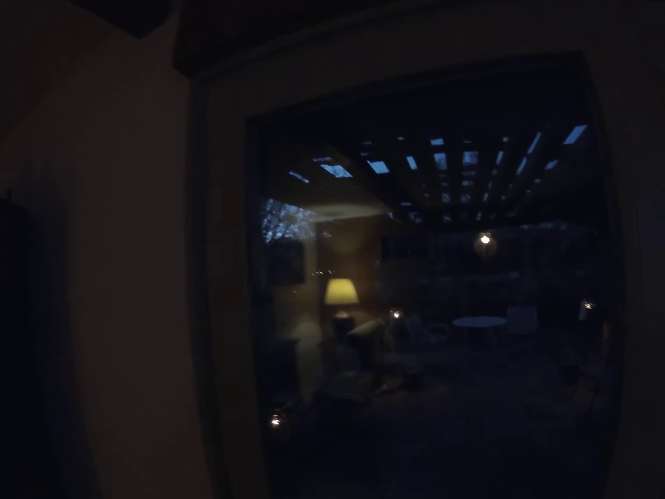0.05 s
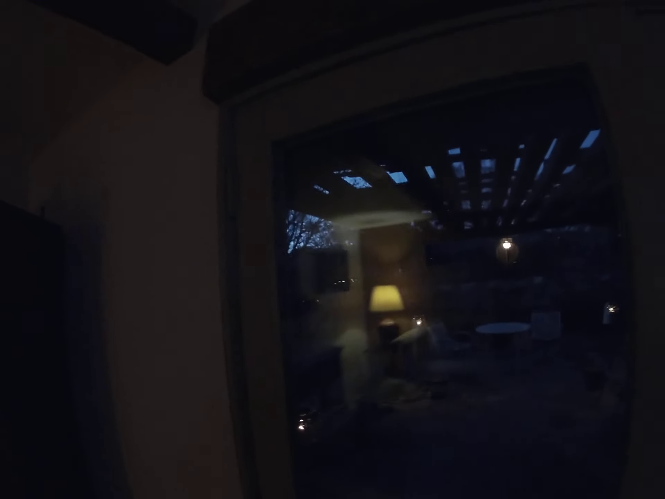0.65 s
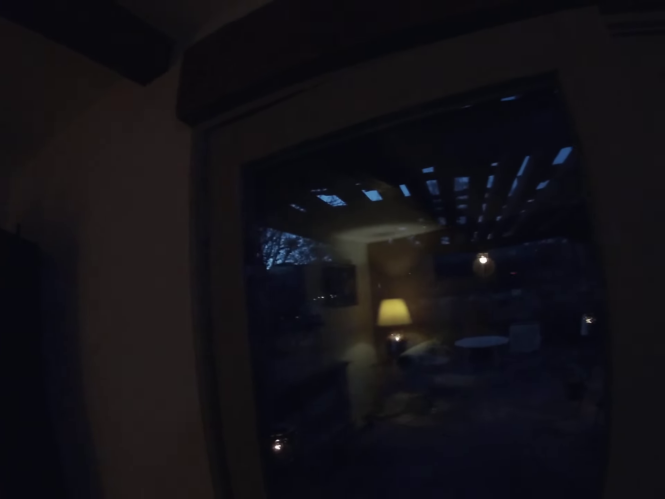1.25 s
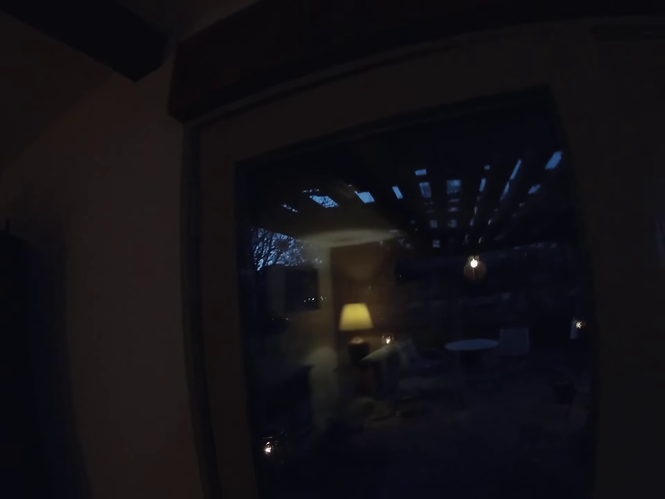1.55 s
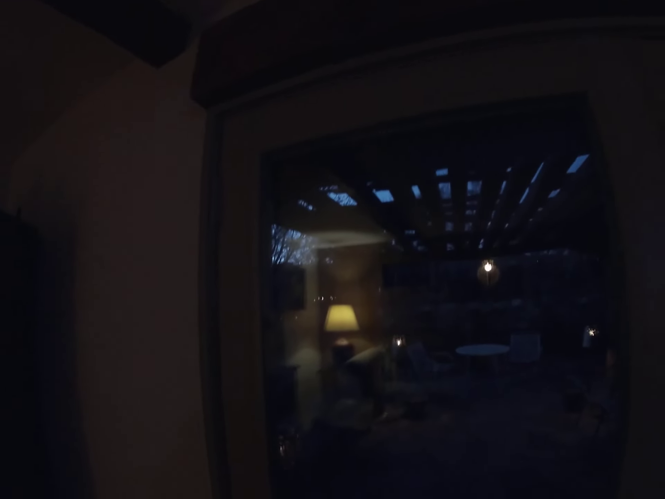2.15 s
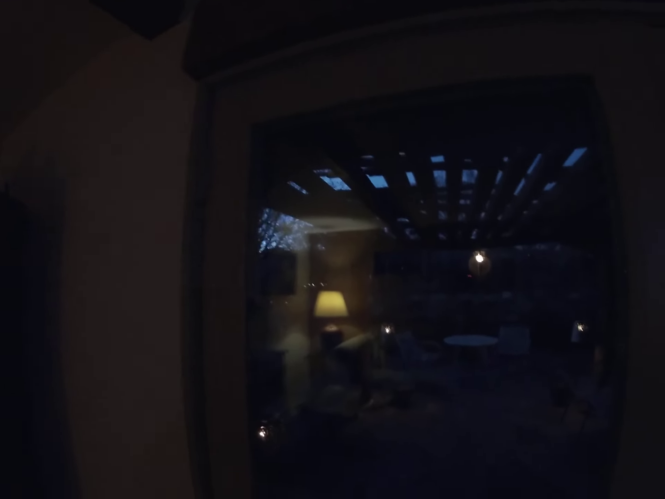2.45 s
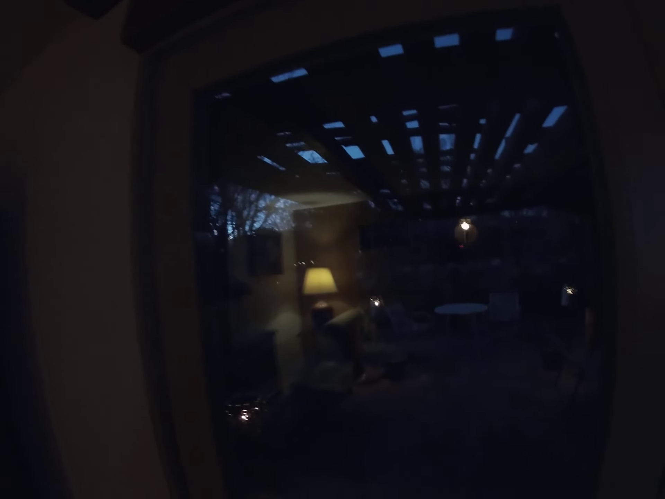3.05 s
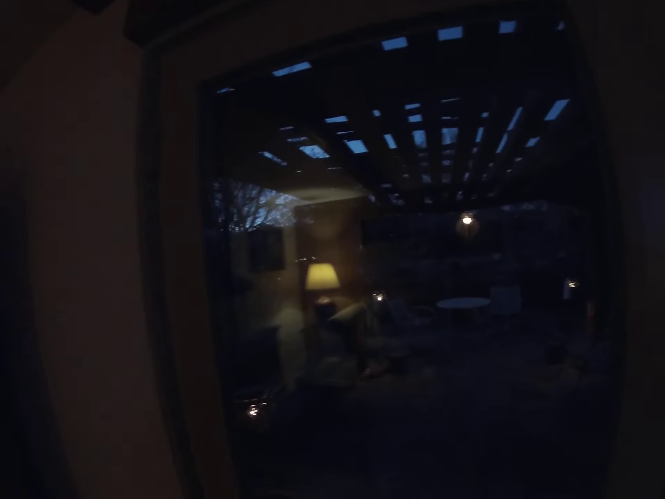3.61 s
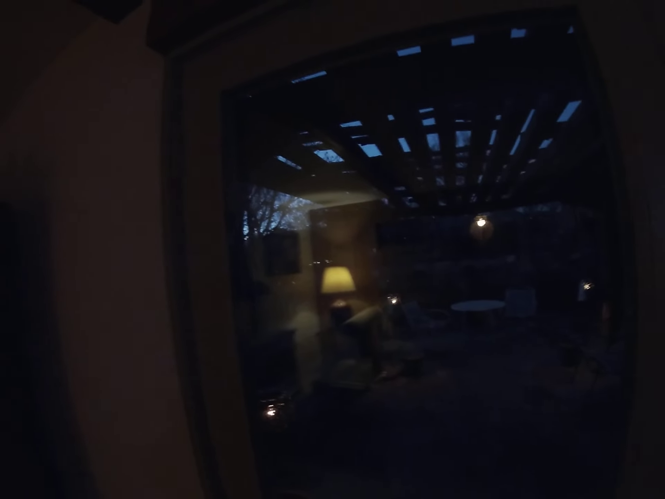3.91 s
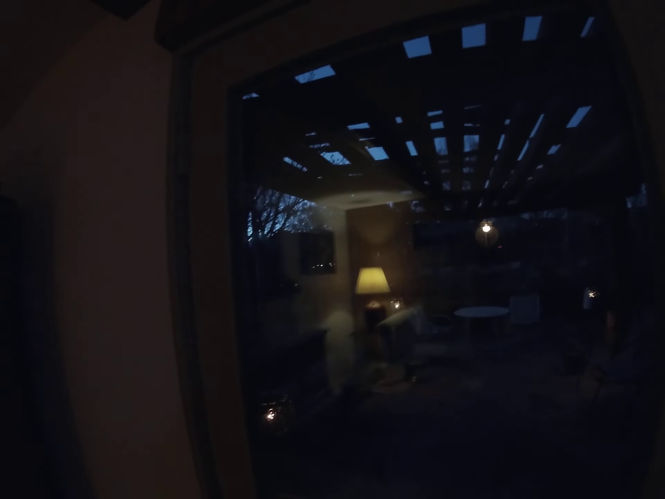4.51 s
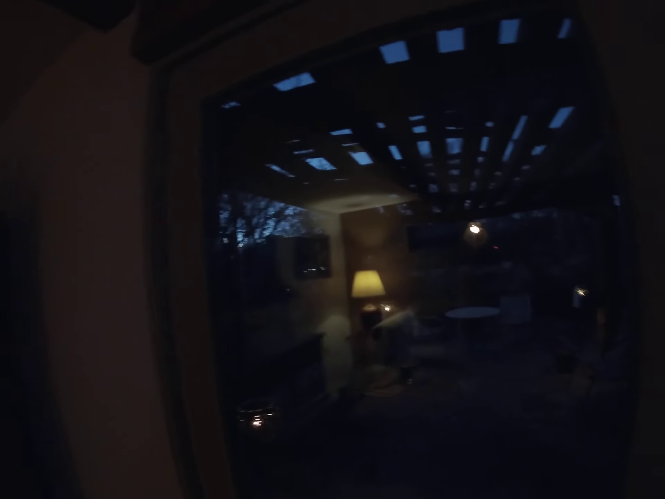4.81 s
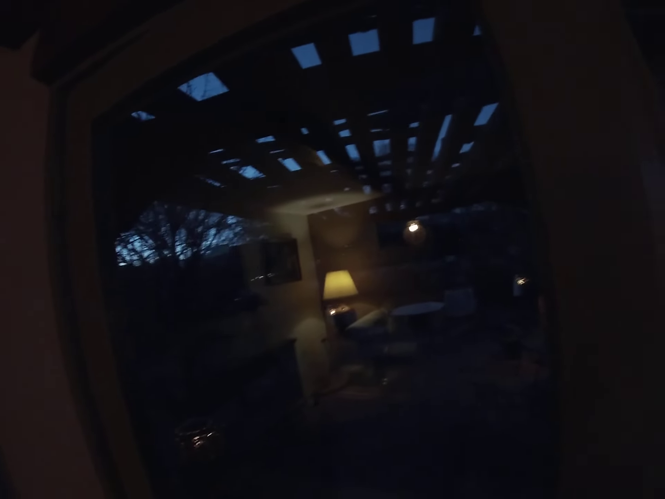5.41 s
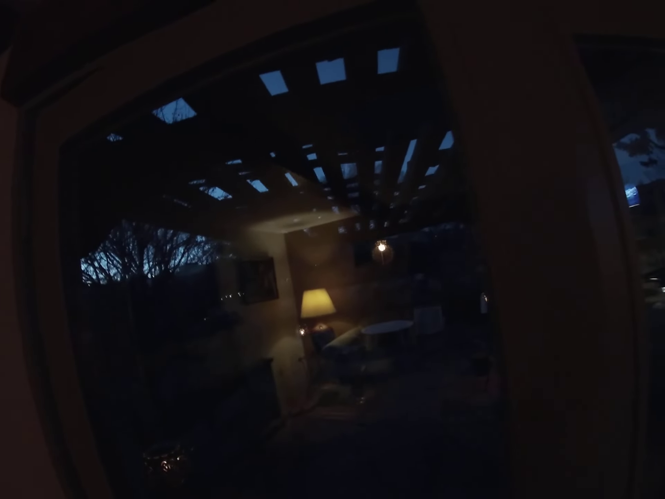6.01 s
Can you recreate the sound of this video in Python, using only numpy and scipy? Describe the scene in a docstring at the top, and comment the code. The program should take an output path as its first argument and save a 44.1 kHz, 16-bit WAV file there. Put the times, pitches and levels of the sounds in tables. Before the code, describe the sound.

Sharp clicks and rattles of a door's lock and handle, with a few heavier thunks as the glass-paned wooden door is shoved.

```python
"""A glass-paned wooden door worked by hand, close to a single microphone in a quiet living room.
Key, bolt and handle click and chatter in the lock; between the clicks metal scrapes and loose parts tick.
Each blow knocks the door in its frame and rings wood and glass. Two bouts of hard shoving, after a
gentler one, make the door boom and the air sway. The room answers the metal over a faint background."""
import sys
import numpy as np
from scipy import signal
from scipy.fft import rfft, irfft
from scipy.io import wavfile

SR = 44100
rng = np.random.default_rng(int(sys.argv[2]) if len(sys.argv) > 2 else 0)


def wav_record(signal):
    """Record a signal, one row per channel, as 16-bit PCM in the file named by sys.argv[1]."""
    frames = np.transpose(np.atleast_2d(signal))
    bounded = np.clip(frames, -1, 1)
    # unit amplitude maps onto the largest positive 16-bit level
    quanta = np.round(bounded * 32767).astype(np.int16)
    wavfile.write(sys.argv[1], SR, quanta)


N = 276066

# Blows of bolt and handle: start_s, level_db, weight_db, edge_db, pitch_hz, snap_share (0-1)
# Weight (into the wood) and edge (treble) are relative to the level; snap is the first impact's energy.
BLOWS = [(0.105, -61, -8, 2, 5300, .1), (0.1355, -30, -22, 2.5, 5950, 0.04),
         (0.144, -36.5, -35, 1, 2350, 0.92), (0.2208, -46, -10.5, -4, 2440, 0.67),
         (0.327, -51, -1.5, -4, 2740, 0.32), (0.34, -49, 1, -4, 2020, 0.25),
         (0.623, -47.5, -13.5, -4, 2050, 0.1), (0.97, -55, -9, -6, 1640, 0.1),
         (0.994, -41.5, -25, 0, 2300, 0.42), (1.1706, -36, -21, 2.5, 2450, 0.33),
         (1.304, -41.5, -14, -4, 1910, 0.18), (1.363, -45, 5.5, -7.5, 760, 0.27),
         (1.451, -48, 9, -21, 710, 0.19), (1.524, -47, 1.5, -5.5, 1800, 0.01),
         (1.5973, -50.5, 0.5, -6.5, 1755, 1), (1.766, -39.5, 2.5, -10.5, 1711, 0),
         (1.7943, -37, -5, 7.5, 2170, 0), (1.801, -30.5, -2.5, -7.5, 3290, 0.37),
         (1.884, -41, -5, -12, 3290, 0.97), (2.039, -29.5, -3, -2, 2056, 0.14),
         (2.067, -39, -9.5, 4.5, 4110, 0.62), (2.0896, -37, 7.5, -19, 1910, 1),
         (2.17, -41, 0.5, -7, 1950, 0.42), (2.402, -52.5, 16, -15.5, 710, 0),
         (2.543, -55.5, 11, -4.5, 975, 0.2), (2.699, -32.5, 3.5, -5.5, 1560, 0.07),
         (2.779, -48, -12, -4.5, 1470, 0.1), (2.964, -82, -8, 22, 5200, 0.18),
         (3.187, -51, -2, -12, 2130, 0), (3.267, -58.5, 2, -1, 2020, 0),
         (3.309, -53.5, 6.5, -12, 590, 0.25), (3.336, -50.5, -12, -6.5, 2040, 0.27),
         (3.368, -39, -10, -9, 2045, 0.4), (3.396, -44, -11, -1, 2470, 0.17),
         (3.46, -34.5, -21, -8, 1910, .4), (3.619, -65.5, -24, 2.5, 2240, 0.07),
         (3.68, -79.5, 26, -5, 590, .02), (3.919, -49, -3.5, -3, 5500, 0), (4.001, -52, 9.5, -5, 560, 0.37),
         (4.049, -48.5, 9, -10, 540, 0.34), (4.087, -45.5, -27, -13, 3300, 0.43),
         (4.3128, -38, -2.5, -4.5, 3260, 0.77), (4.391, -43, -18.5, -14, 3120, .95),
         (4.4148, -26.5, -14.5, -9.5, 2145, 0.42), (4.4414, -30.5, -23, -2.5, 1332, 0.7),
         (5.141, -54, 7.5, -10, 930, 0.21), (5.24, -49, -6.5, -2, 1720, 0.08),
         (5.358, -54, -15, 8, 5500, .3), (5.406, -52.5, -21, 7, 1970, 0),
         (5.438, -42.5, -5, -4.5, 1980, 0.02), (5.9, -47, -4.5, -5.5, 1640, 0.08),
         (5.953, -43.5, -2.5, -3.5, 1090, 0), (6.029, -55, 1, 1.5, 1516, .3),
         (6.07, -40.5, -12, -2.5, 2000, 0.13), (6.077, -40, -13.5, -3.5, 1860, 0.3),
         (6.119, -50.5, 6, 7, 3240, 0.1), (6.157, -36, -15, -1, 1720, 0.1)]
# Pushes on the whole door: start_s, level_db
PUSHES = [(.55, -49.5), (0.634, -44), (0.857, -50), (1.805, -27.5), (1.9, -21), (2.034, -13.5),
          (2.111, -18.5), (2.173, -27), (4.278, -39.5), (4.31, -30), (4.368, -24)]
# Strokes of metal on metal: start_s, end_s, level_db, squeak_hz, squeak_height_db
STROKES = [(0.347, .38, -57.5, 3500, 4), (0.5, 0.61, -63.5, 2100, 14), (.615, 0.733, -53, 2210, 15.5),
           (1.368, 1.58, -67.5, 1390, 6.5), (1.588, 1.661, -61, 1800, 16), (1.744, 1.841, -48, 1545, 7.5),
           (1.839, 2.08, -59, 1993, 7), (2.041, 2.115, -42.5, 1230, 8), (2.5, 2.66, -69, 975, -2.5),
           (3.366, 3.44, -54.5, 1900, 5), (3.441, 3.514, -52.5, 1620, 21), (3.951, 4.07, -59.5, 1212, 6),
           (4.256, 4.404, -53, 2050, 9.5), (4.43, 4.457, -32.5, 3700, 7), (5.186, 5.26, -64.5, 2430, 2.5),
           (5.384, 5.44, -54, 5400, 9.5), (5.92, 5.958, -54, 2400, 5), (6.054, 6.114, -49, 1670, 4),
           (6.092, 6.148, -51, 4460, 5)]
# Response of the lock and its plate: frequency_hz, gain_db
LOCK_BODY = [(60, 15.5), (250, 32), (500, 38), (900, 36.5), (1300, 36), (1650, 38.5), (2100, 35.5),
             (2700, 34), (3400, 34), (4700, 32.5), (6200, 31.5), (7300, 23), (9300, 7), (14000, -20)]
# Modes of a struck pin or spring: pitch_ratio, level_db, t60_s
PIN_MODES = [(1, 2.5, 0.014), (1.089, -6.5, .016), (1.65, -4, .015), (3.5, -5, 0.025)]
# Modes of the door frame: pitch_hz, level_db, t60_s
FRAME_MODES = [(191.3, -3, 0.21), (292, -6.5, 0.031), (578.5, -14, 0.014)]
# Modes of the wooden panel: pitch_hz, level_db, t60_s
PANEL_MODES = [(162.8, -5, 0.51), (214.67, 0.5, 0.58), (352, -13, 0.45), (452.5, -15.5, 0.28)]
# Modes of the glass: pitch_hz, level_db, t60_s
PANE_MODES = [(81.5, -3.5, .4), (108.7, 1.5, 0.33), (122.9, -1, 0.34), (253.5, -7, 0.32),
              (287.4, -8.5, 0.5)]
# Modes of the whole door leaf: pitch_hz, level_db, t60_s
LEAF_MODES = [(26, -4, 0.16), (41.48, 0, 0.72), (54.4, -12, 0.18)]
# Spectrum of the wood's many close modes: frequency_hz, level_db
THUD_SPECTRUM = [(40, -4.5), (90, -6.5), (150, 3.5), (210, 4), (320, -6.5), (500, -14.5), (900, -19.5),
                 (2000, -49), (5000, -98.5)]
# Reverberation of the living room: frequency_hz, t60_s
ROOM_DECAY = [(100, 0.5), (260, 0.41), (700, 0.42), (1840, 0.33), (4850, 0.34), (8000, 0.23), (13000, 0.37)]
# Spectrum of the room's background: frequency_hz, level_db
ROOM_TONE = [(25, 6), (100, -5.5), (190, 3), (300, -11), (450, -16), (650, -11.5), (850, -4), (1100, -17),
             (2000, -17), (3300, -21.5), (5500, -17.5), (8000, -29.5), (10500, -33.5), (14000, -58)]
# Spectrum of the shoved door's rumble: frequency_hz, level_db
RUMBLE_SPECTRUM = [(10, -7.5), (25, -11), (58, -3), (90, -5.5), (160, -20), (500, -89.5)]
# Colour of sliding metal: frequency_hz, gain_db
SCRAPE_COLOUR = [(500, -1.5), (2000, 1.5), (6000, -5)]


def amp(db):
    """Decibels to gain."""
    return 10 ** (np.asarray(db) / 20)


def unit(x):
    """Scale to rms 1."""
    return x / np.sqrt(np.mean(x ** 2) + 1e-20)


def along(points, hz):
    """(Hz, value) points read on a log axis."""
    frequencies, values = np.transpose(points)
    return np.interp(np.log(hz + 1), np.log(frequencies + 1), values)


def add(track, start_s, sound):
    """Mix a sound into the track."""
    part = track[max(round(start_s * SR), 0):][:len(sound)]
    part += sound[:len(part)]


def noise(spectrum, size):
    """Coloured noise of rms 1."""
    hz = np.fft.rfftfreq(size, 1 / SR)
    return unit(irfft(rfft(rng.standard_normal(size)) * amp(along(spectrum, hz)), size))


def ring(modes, t, scatter_db=1.5, detune=0.011):
    """Damped modes, at new strengths and slightly new pitches for every blow."""
    sound = np.zeros(len(t))
    for hz, db, t60 in modes:
        loud, sharp = rng.standard_normal(2)
        envelope = amp(db + scatter_db * loud - 60 * t / t60)
        sound += envelope * np.sin(2 * np.pi * hz * (1 + detune * sharp) * t)
    return sound


def blow_colour(db, weight_db, edge_db):
    """Spectrum of one blow as (Hz, dB): weight fills the low end, a bare edge the top."""
    return [(700, db + weight_db / 2 + 2), (1600, db), (2500, db), (4500, db + edge_db)]


def lock_response(colour, peak_hz, peak_db, width, size=1024):
    """Minimum-phase impulse response of the lock, coloured by the contact, with one added resonance."""
    hz = np.fft.rfftfreq(size, 1 / SR)
    peak = np.exp(-(np.log((hz + 1) / peak_hz) / width) ** 2)
    gain = amp(along(LOCK_BODY, hz) + along(colour, hz) + peak_db * peak)
    cepstrum = irfft(np.log(gain))
    cepstrum[1:size // 2] *= 2
    cepstrum[size // 2 + 1:] = 0
    return irfft(np.exp(rfft(cepstrum)))


def room_tail(wet_db, build_s=0.0052):
    """What the walls send back to the microphone: echoes build up, and the bass lingers longest."""
    hz, t, spectra = signal.stft(rng.standard_normal(SR * 2 // 3), SR, nperseg=256)
    decay = amp(-60 * t / along(ROOM_DECAY, hz)[:, None])
    echo = signal.istft(spectra * decay, SR, nperseg=256)[1]
    echo *= 1 - np.exp(-(np.arange(len(echo)) / SR / build_s) ** 2)
    return amp(wet_db) * echo / np.linalg.norm(echo)


def room_tone(level_db=-69):
    """The faint, steady background of the living room."""
    return amp(level_db) * noise(ROOM_TONE, N)


def lock_clicks(contacts, chatter_t60=0.024, rebound_s=0.0077, rebound_db=-12.5, lead_in_s=0.0052):
    """Each contact snaps and dies in a chatter of tiny rebounds that ring the struck part."""
    track, t = np.zeros(N), np.arange(SR // 20) / SR
    for start_s, db, weight_db, edge_db, pitch_hz, snap in contacts:
        chatter = rng.standard_normal(len(t))
        chatter *= amp(0.5 * rng.standard_normal(len(t)) - 60 * t / chatter_t60)
        chatter *= 1 - np.exp(-t * (snap + 0.15) / 0.0003)  # a clean snap starts faster
        force = np.sqrt(1 - snap) * chatter / np.linalg.norm(chatter)
        force[0] = np.sqrt(snap)
        impact = room_tail(wet_db=-2)
        add(impact, 0, force)
        # a part that does not snap home strikes again
        add(impact, rebound_s, amp(rebound_db) * (1 - snap) * force * rng.standard_normal(len(t)))
        # a faint, brief swell of noise just before each click, weaker for clean snaps
        lead_in = rng.standard_normal(len(t)) * np.exp(-t[::-1] / lead_in_s)
        lead_in *= amp(-15) * (1 - snap) / np.linalg.norm(lead_in)
        body = lock_response(blow_colour(db, weight_db, edge_db), pitch_hz, peak_db=6, width=0.1)
        add(track, start_s - len(t) / SR, signal.fftconvolve(np.concatenate([lead_in, impact]), body))
    return amp(-3) * track


def pin_clinks(gain_db=12, attack_s=0.00026):
    """The struck pin rings briefly, the more the cleaner the snap, with little answer from the room."""
    track, t = np.zeros(N), np.arange(SR // 10) / SR
    for start_s, db, weight_db, edge_db, pitch_hz, snap in BLOWS:
        drive = blow_colour(db, weight_db, edge_db) + [(6300, db + edge_db), (10000, db + edge_db - 34.5)]
        modes = [(ratio * pitch_hz, along(drive, ratio * pitch_hz) + mode_db + gain_db, t60)
                 for ratio, mode_db, t60 in PIN_MODES]
        clink = snap * ring(modes, t) * (1 - np.exp(-t / attack_s))
        add(track, start_s, clink)
        add(track, start_s, signal.fftconvolve(clink, room_tail(wet_db=-11)))
    return track


def door_knocks(firm_knock_db=-44, thud_t60=0.46):
    """The weight of each blow bumps the frame, then rings panel and pane over a thud of close modes."""
    track, t = np.zeros(N), np.arange(SR) / SR
    for start_s, level_db, weight_db, *_ in BLOWS:
        db = level_db + weight_db
        bump = amp(db + 4) * ring(FRAME_MODES, t) * (1 - np.exp(-t / 0.0035))
        panel = amp(db - 1) * ring(PANEL_MODES, t)
        pane_db = db - 12 + 0.3 * (db - firm_knock_db)  # harder knocks bring out the glass
        pane = amp(pane_db) * ring(PANE_MODES, t)
        ringing = (panel + pane) * (1 - np.exp(-t / 0.016))
        thud = amp(db - 2 - 60 * t / thud_t60) * noise(THUD_SPECTRUM, len(t))
        add(track, start_s, bump + ringing + thud * (1 - np.exp(-t / 0.014)))
    return track


def metal_scrapes(slips_per_s=1400, rub_gain=0.018):
    """Sliding parts catch and slip at random, ringing the lock and one squeak."""
    track = np.zeros(N)
    for start_s, end_s, db, squeak_hz, squeak_db in STROKES:
        size = round((end_s - start_s) * SR)
        slips = (rng.random(size) < slips_per_s / SR) * rng.standard_normal(size)
        friction = (slips + rub_gain * rng.standard_normal(size)) * signal.windows.tukey(size, 0.5)
        body = lock_response(SCRAPE_COLOUR, squeak_hz, squeak_db, width=0.16)
        stroke = amp(db) * unit(signal.fftconvolve(friction, body))
        add(track, start_s, stroke)
        add(track, start_s, signal.fftconvolve(stroke, room_tail(wet_db=-4)))
    return amp(-2) * track


def loose_ticks(ticks_per_s=27, spread=0.25, scatter_db=3.5, weight_db=-3, edge_db=3.5, snap=0.41):
    """Loose parts tick unevenly, loudest in mid-stroke, softer where it squeaks; rows as in BLOWS."""
    rows = []
    for start_s, end_s, db, squeak_hz, squeak_db in STROKES:
        for k, (late, loud, sharp) in enumerate(rng.standard_normal((16, 3))):
            tick_s = start_s + (k + 0.5 + spread * late) / ticks_per_s
            if start_s < tick_s < end_s:
                swell_db = 20 * np.log10(np.sin(np.pi * (tick_s - start_s) / (end_s - start_s)))
                tick_db = db + 3 + swell_db - squeak_db / 2 + scatter_db * loud
                rows.append((tick_s, tick_db, weight_db, edge_db, squeak_hz * np.exp(spread * sharp), snap))
    return rows


def door_shoves(sway_hz=9.2, sway_t60=2.21, rumble_t60=0.54, attack_s=0.01):
    """The whole leaf booms, shakes its pane, and pumps the room's air into a slow sway."""
    track, t = np.zeros(N), np.arange(2 * SR) / SR
    for start_s, db in PUSHES:
        rumble = amp(-8 - 60 * t / rumble_t60) * noise(RUMBLE_SPECTRUM, len(t))
        boom = ring(LEAF_MODES, t)
        pane = amp(-15) * ring(PANE_MODES, t)
        sway = amp(-7 - 60 * t / sway_t60) * np.sin(2 * np.pi * sway_hz * t)
        add(track, start_s, amp(db) * (rumble + boom + pane + sway) * (1 - np.exp(-t / attack_s)))
    return track


def scene():
    """Room, door and lock as they meet at the one microphone."""
    background = room_tone()
    wood = door_knocks() + door_shoves()
    metal = pin_clinks() + metal_scrapes() + lock_clicks(BLOWS + loose_ticks())
    return (background + wood + metal)[None]


def record(dry, top_hz=14000):
    """The recorder cuts off steeply above its band limit."""
    return signal.sosfilt(signal.ellip(10, 0.1, 90, top_hz, fs=SR, output="sos"), dry)


dry = scene()
out = record(dry)
wav_record(out)
```